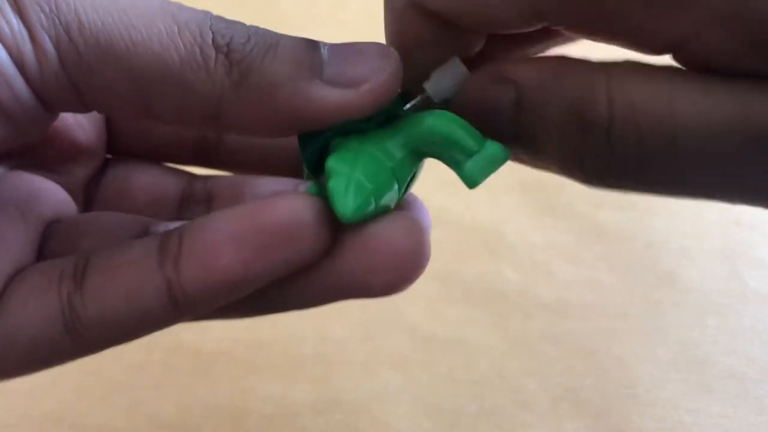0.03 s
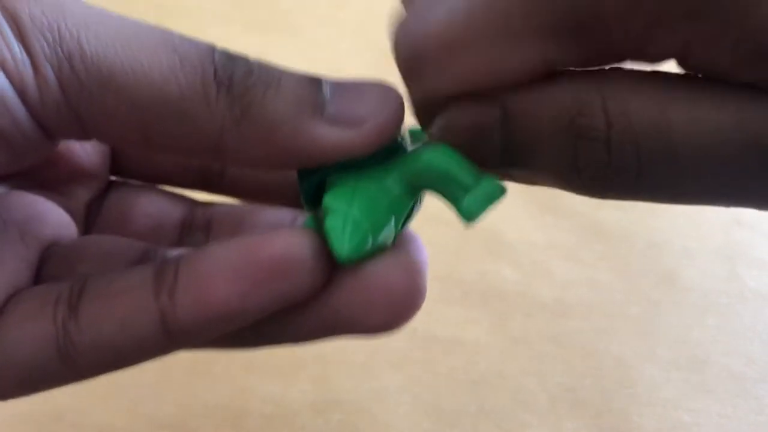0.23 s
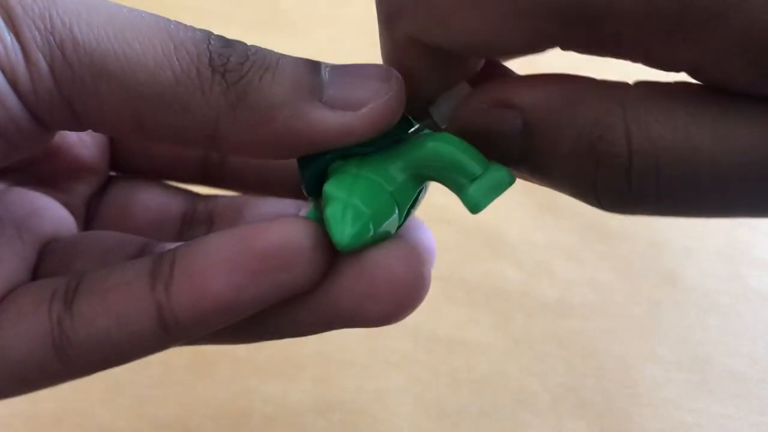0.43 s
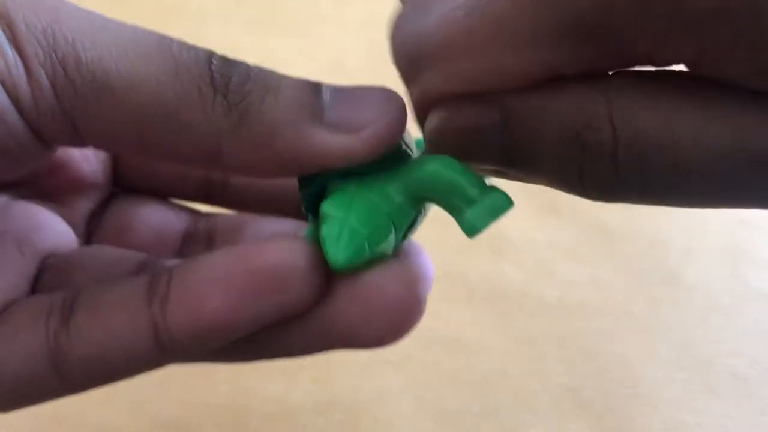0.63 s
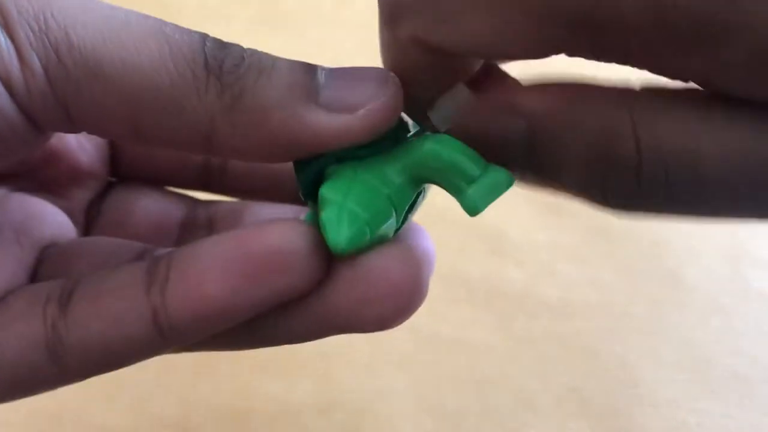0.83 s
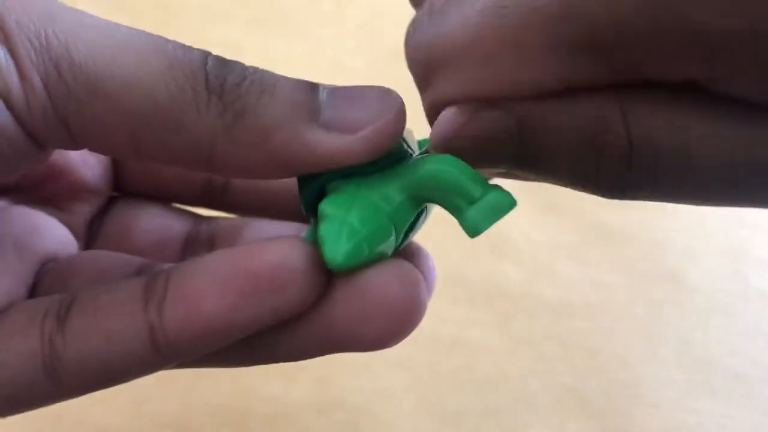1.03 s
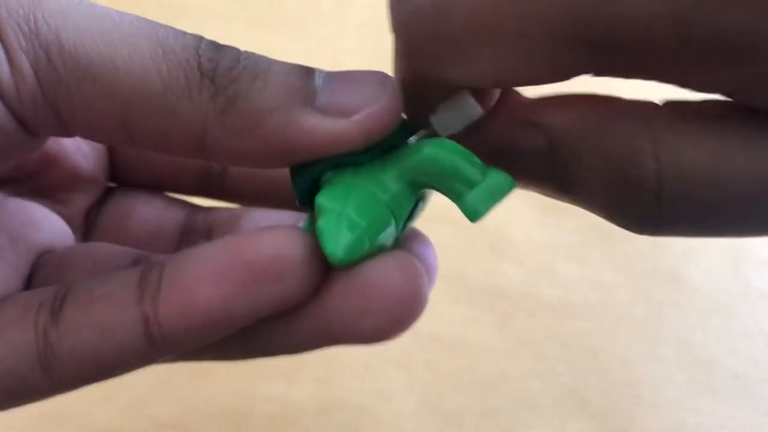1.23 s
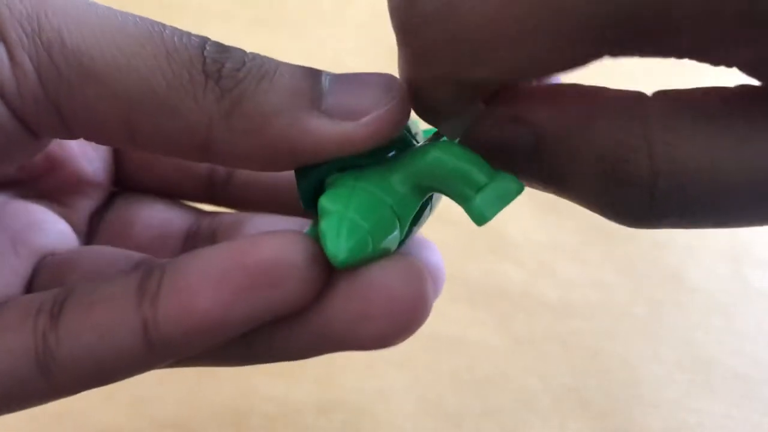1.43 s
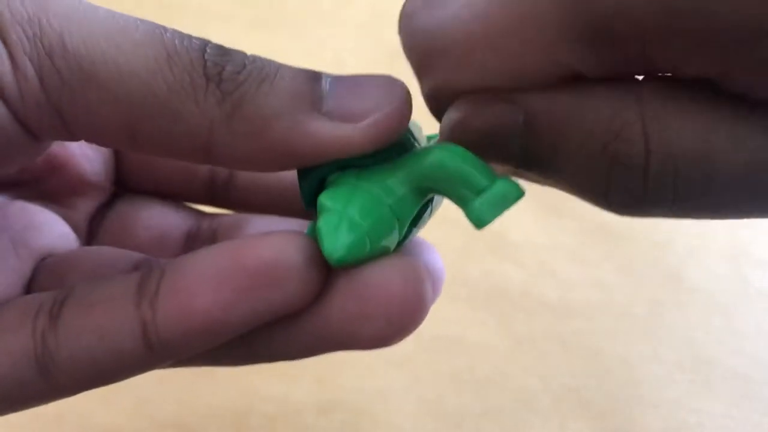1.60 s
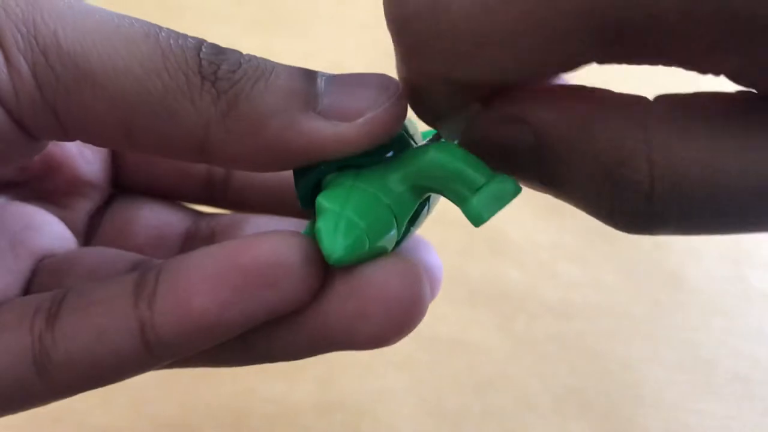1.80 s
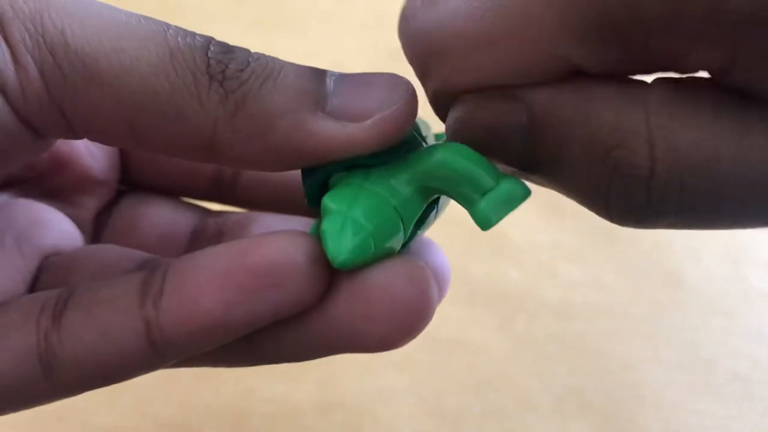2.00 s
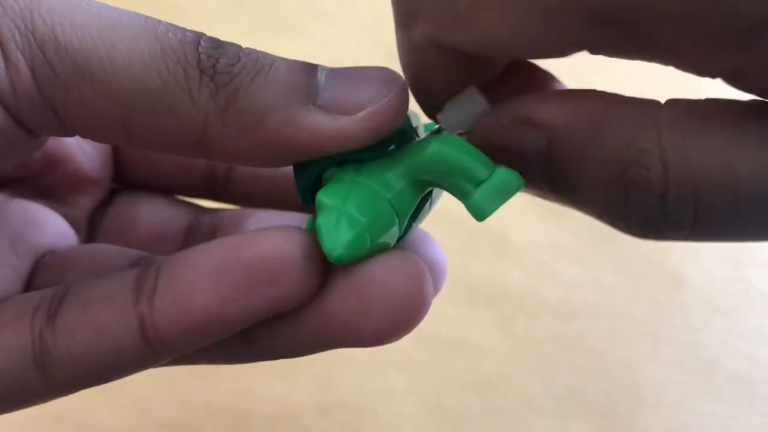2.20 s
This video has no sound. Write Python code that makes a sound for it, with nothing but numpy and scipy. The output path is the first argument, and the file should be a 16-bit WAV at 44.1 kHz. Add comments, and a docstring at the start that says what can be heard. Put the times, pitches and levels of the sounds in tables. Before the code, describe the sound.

Ratcheting clicks from a little wind-up toy come in five quick bursts as fingers turn its knob. After each, the gears rasp briefly and fingertips softly regrip the plastic. The sound is close, in a quiet room.

```python
"""A quiet room, close to the microphone: fingers twist the knob of a small plastic wind-up toy five times.
Each twist takes up the slack with light ticks, then the pawl snaps over its teeth and rings the shell.
A short, fast rasp of the gears follows, and the fingertips rub and tap as they take a new grip.
Under it lie a low rumble, faint hiss and weak hum; a short room tail follows the toy."""
import sys
import numpy as np
from scipy import signal
from scipy.fft import rfft, irfft
from scipy.io import wavfile

SR = 44100
rng = np.random.default_rng(int(sys.argv[2]) if len(sys.argv) > 2 else 0)


def file_out(sig):
    """Save sig as 16-bit WAV at sys.argv[1]."""
    # one column per channel
    cols = np.atleast_2d(sig).T
    # limit, then scale
    lim = np.clip(cols, -1, 1)
    pcm = np.round(lim * 32767).astype(np.int16)
    wavfile.write(sys.argv[1], SR, pcm)


N = 103635
HIT_S = .03  # time allowed for one hit to ring out


def undb(db):
    """Decibels to gain."""
    return 10 ** (np.asarray(db) / 20)


def seconds(length):
    """Time axis of a short sound."""
    return np.arange(int(length * SR)) / SR


def level(x, db, span=.002):
    """Give x the energy of a sound that stays at db for span seconds."""
    return x * undb(db) * np.sqrt(span * SR / (np.sum(x ** 2) + 1e-18))


def add(out, start, x):
    """Mix x into out at a time."""
    i = max(int(start * SR), 0)
    x = x[:max(len(out) - i, 0)]
    out[i:i + len(x)] += x


def colour(x, points):
    """Minimum-phase EQ through (Hz, dB) points: nothing rings ahead of an attack."""
    hz, db = np.array(points).T
    size = 4096
    f = np.maximum(np.arange(size // 2 + 1) * SR / size, 1)
    gain = undb(np.interp(np.log(f), np.log(np.sort(hz)), db))
    cepstrum = irfft(np.log(gain))
    cepstrum[1:size // 2] *= 2
    cepstrum[size // 2 + 1:] = 0
    return signal.fftconvolve(x, irfft(np.exp(rfft(cepstrum))))[:len(x)]


def ring(push, hz, t60):
    """One resonance set ringing by a push."""
    pole = np.exp((2j * np.pi * hz - np.log(1000) / t60) / SR)
    acceleration = signal.lfilter([1, -2, 1], [1], push)
    return signal.lfilter([1], [1, -pole], acceleration).imag


def struck(hz, t60):
    """A resonance dying away after one blow."""
    t = seconds(HIT_S)
    return np.sin(2 * np.pi * hz * t) * undb(-60 * t / t60)


def contact(rise_s, fall_s):
    """Brief chatter of two plastic faces: swells, then dies."""
    t = seconds(HIT_S)
    attack = np.minimum(t / rise_s, 1) ** 2
    decay = np.exp(-np.maximum(t - rise_s, 0) / fall_s)
    return rng.standard_normal(len(t)) * attack * decay


def friction(length, grains_per_s=710, scatter_db=.5, grain_s=.00035):
    """Two surfaces stick and slip in tiny grains."""
    n = int(length * SR)
    slips = (rng.random(n) < grains_per_s / SR) * undb(scatter_db * rng.standard_normal(n))
    grip = signal.lfilter([1], [1, -np.exp(-1 / (grain_s * SR))], slips) + .5
    return grip * rng.standard_normal(n) * signal.windows.tukey(n, .3)


# Bass-heavy room tone: (frequency [Hz], gain [dB])
AIR_EQ = [(25, -27), (45, 1), (65, 2), (200, -6), (350, -9), (500, -17), (2500, -23.5), (5300, -24.5),
          (8000, -28), (15500, -32)]
def room_tone(air_db=-63, hum_hz=140, hum_db=-80):
    """The bed: low rumble, faint hiss and a weak hum."""
    hum = np.sqrt(2) * undb(hum_db) * np.sin(2 * np.pi * hum_hz * np.arange(N) / SR)
    air = colour(rng.standard_normal(N), AIR_EQ)
    return level(air, air_db, N / SR) + hum


# Warm tone of the reflections: (frequency [Hz], gain [dB])
REVERB_EQ = [(1500, 11), (3300, 3), (5000, -6), (7000, 3), (11500, 2), (16500, -4)]
def reverb(x, early_t60=.05, early_db=-17.5, tail_t60=.32, tail_db=-21):
    """Quick reflections from hands and table, then the short tail of the room."""
    t = seconds(.6)
    fade_in = np.minimum(t / .0019, 1)
    response = 0
    for t60, db in ((early_t60, early_db), (tail_t60, tail_db)):
        echoes = rng.standard_normal(len(t)) * undb(-60 * t / t60) * fade_in
        response = response + level(colour(echoes, REVERB_EQ), db, 1 / SR)
    return signal.fftconvolve(x, response)[:N]


# Fingertips taking a new grip: (time [s], length [s], level [dB])
FINGER_RUBS = [(0, 0.023, -55.5), (0.385, 0.078, -57), (0.794, 0.038, -54.5), (1.118, 0.029, -54),
               (1.18, 0.054, -57), (1.268, 0.0817, -65), (1.683, 0.049, -53), (2.132, 0.0551, -51.5)]
# Tone of skin on plastic: (frequency [Hz], gain [dB])
RUB_EQ = [(500, -24), (2000, -23.5), (4200, -11), (5400, -4.5), (6400, -13), (11500, -17.5), (16000, -25.5)]
def finger_rubs():
    """Fingertips slide on the plastic, and their friction rings the shell."""
    out = np.zeros(N)
    for start, length, db in FINGER_RUBS:
        rub = level(colour(friction(length), RUB_EQ), 0)
        shell = level(ring(rub, hz=5570, t60=.0034), -6.5)
        add(out, start, level(rub + shell, db, length))
    return out


# A finger bumping the body: (time [s], knock level [dB], thump level [dB])
FINGER_KNOCKS = [(0.806, -48.5, -77), (1.204, -44.5, -51.5), (2.16, -56.5, -80)]
# Midrange tone of the bump: (frequency [Hz], gain [dB])
KNOCK_EQ = [(100, -9.5), (550, -16.5), (950, 16), (1500, 2), (8000, 1)]
# Resonances it wakes: (frequency [Hz], relative level [dB], time to fall 60 dB [s])
BODY_MODES = [(992, -19, 0.025), (1630, -13.5, 0.0087)]
def finger_knocks():
    """A soft push rings the body over a low thump."""
    out = np.zeros(N)
    for start, db, thump_db in FINGER_KNOCKS:
        push = level(colour(contact(rise_s=.0046, fall_s=.0011), KNOCK_EQ), 0)
        modes = sum(level(struck(hz, t60), mode_db) for hz, mode_db, t60 in BODY_MODES)
        thump = level(struck(hz=270.4, t60=.021), thump_db)
        add(out, start, level(push + modes, db) + thump)
    return out


# Handling taps: (time [s], level [dB])
SHELL_TAPS = [(.099, -57), (.13, -60.5), (0.3153, -42.5), (0.381, -51.5), (.392, -45), (0.7492, -36),
              (0.7554, -45), (0.807, -41), (.815, -42), (0.87, -51.5), (1.121, -44), (1.183, -48.5),
              (1.2019, -34), (1.233, -45.5), (1.342, -50.5), (1.641, -43), (2.145, -47), (2.1485, -39.5),
              (2.162, -44)]
# Thin, peaky tone of a tap: (frequency [Hz], gain [dB])
TAP_EQ = [(400, -24.5), (2000, -22.5), (3400, -10), (4300, -10.5), (5300, 6.5), (6500, -12.5), (9000, -11),
          (15000, -27)]
def shell_taps():
    """Knob and shell tap lightly under the fingers."""
    out = np.zeros(N)
    for start, db in SHELL_TAPS:
        tap = colour(contact(rise_s=.00069, fall_s=.0018), TAP_EQ)
        add(out, start, level(tap, db))
    return out


# Light ticks of the knob: (time [s], level before trim [dB])
SLACK_TICKS = [(0.1667, -39), (0.175, -36), (0.197, -35), (0.6008, -37), (0.605, -30), (0.6087, -30),
               (0.6118, -33), (0.618, -34), (0.6226, -33), (0.626, -27), (0.9602, -33), (0.963, -35),
               (0.9677, -33), (0.9855, -35), (0.99, -36), (0.9945, -29), (1.149, -40), (1.462, -42),
               (1.467, -35), (1.4706, -33), (1.475, -34), (1.48, -36), (1.8812, -35), (1.8858, -37),
               (1.902, -38), (1.906, -34), (1.9288, -33), (2.083, -40), (2.0888, -38), (2.298, -34),
               (2.303, -36), (2.308, -32), (2.321, -38), (2.3483, -33)]
# Bright tone of the ticks, also of shaft scrape and pawl rattle: (frequency [Hz], gain [dB])
TICK_EQ = [(500, -45.5), (2000, -24), (5400, -3.5), (6600, 0), (7700, -6.5), (10500, -5.5), (14000, -2),
           (16500, -24.5)]
def slack_ticks(trim_db=-.5):
    """Plastic faces touch as the knob takes up its slack."""
    out = np.zeros(N)
    for start, db in SLACK_TICKS:
        tick = colour(contact(rise_s=.00056, fall_s=.0012), TICK_EQ)
        add(out, start, level(tick, db + trim_db))
    return out


# Scrapes of the knob's shaft: (time [s], length [s], level [dB])
SHAFT_SCRAPES = [(1.87, .065, -47.5), (2.288, .048, -49)]
def shaft_scrapes():
    """The shaft sticks and slips as it starts to turn."""
    out = np.zeros(N)
    for start, length, db in SHAFT_SCRAPES:
        add(out, start, level(colour(friction(length), TICK_EQ), db, length))
    return out


# Rasp after each twist: (time [s], full-speed hold [s], level [dB], rate [teeth/s], whistle [Hz])
GEAR_RASPS = [(0.3469, 0.016, -30, 544, 13750), (0.7629, 0.01302, -27.5, 553, 10400),
              (1.1539, 0.016, -27.5, 422, 13500), (1.663, 0.012, -29, 560, 12160),
              (2.094, 0.01567, -28.5, 590, 11340)]
# Sharp, fizzy tone of the gears: (frequency [Hz], gain [dB])
GEAR_EQ = [(500, -45), (2000, -27.5), (3400, -17), (4250, -15.5), (4650, -0.5), (4900, -11.5), (5400, 6),
           (6200, -6), (8000, -8), (10150, -4.5), (10600, -9.5), (11300, -6), (15700, -6), (16500, -26.5)]
def gear_rasps(fade_s=.013, half_speed_s=.013, sag_db_per_s=82, scrape_db=-10.5, scatter_db=1.5):
    """Teeth skip by in a quick train that slows and fades, scraping and ringing a high resonance."""
    out = np.zeros(N)
    t = seconds(.09)
    attack = np.minimum(t / .00082, 1)
    for start, hold, db, rate, whistle_hz in GEAR_RASPS:
        coasting = np.maximum(t - hold, 0)
        speed = rate / (1 + coasting / half_speed_s)
        teeth, at = np.zeros(len(t)), 0
        for gap, size in rng.standard_normal((40, 2)):
            if at >= t[-1]:
                break
            add(teeth, at, contact(rise_s=.00055, fall_s=.00053) * undb(scatter_db * size))
            at += np.exp(.23 * gap) / speed[int(at * SR)]  # slightly uneven spacing
        scrape = undb(scrape_db) * rng.standard_normal(len(t))
        envelope = attack * np.exp(-coasting / fade_s) * undb(-sag_db_per_s * t)
        rasp = level(colour((teeth + scrape) * envelope, GEAR_EQ), 0)
        whistle = level(ring(rasp, whistle_hz, t60=.0045), -10.5)
        add(out, start, level(rasp + whistle, db, hold + fade_s / 2))
    return out


def tooth_burst(eq, peak_s=.0016, scatter_db=2.5):
    """The pawl slides off a tooth and lands: a quick burst, its length and tone new each time."""
    hz, db = np.array(eq).T
    age = 2 * seconds(HIT_S) / (peak_s * np.exp(.22 * rng.standard_normal()))
    burst = rng.standard_normal(len(age)) * (age * np.exp(-age)) ** 2
    varied_db = db + scatter_db * rng.standard_normal(len(hz))
    return colour(burst, np.column_stack([hz, varied_db]))


# The pawl clearing each tooth: (time [s], shell level [dB], crack level [dB], ring pitch [Hz])
PAWL_SNAPS = [(0.2079, -21.0, -20.5, 5380), (0.2186, -31.5, -15.5, 5430), (0.2246, -24.0, -14.5, 5520),
              (0.2293, -25.5, -16.5, 5320), (0.2351, -20.5, -25.5, 5290), (0.2428, -22.5, -24.5, 5340),
              (0.252, -20.0, -22.5, 5200), (0.2748, -24.5, -25.0, 4550), (0.2782, -23.5, -25.0, 4710),
              (0.6286, -21.0, -21.0, 5460), (0.6385, -21.0, -24.5, 5600), (0.6475, -27.5, -24.5, 4800),
              (0.6538, -20.0, -21.0, 5240), (0.6609, -23.0, -18.5, 4740), (0.6733, -26.0, -31.0, 4680),
              (0.6752, -19.0, -17.0, 5190), (0.9971, -20.5, -22.0, 5600), (1.0051, -24.0, -22.5, 4660),
              (1.0092, -28.0, -24.5, 4580), (1.0132, -24.5, -22.0, 5080), (1.0198, -24.0, -22.0, 5400),
              (1.0307, -23.5, -21.0, 5130), (1.0456, -20.0, -21.0, 4740), (1.0812, -23.5, -24.5, 5150),
              (1.4842, -27.5, -26.0, 5330), (1.5036, -24.5, -18.0, 5400), (1.5254, -21.0, -22.0, 5220),
              (1.54, -17.0, -24.0, 5290), (1.5546, -21.5, -21.5, 4810), (1.5669, -24.5, -21.5, 5140),
              (1.5826, -23.0, -21.0, 5030), (1.9107, -19.0, -23.5, 5050), (1.9318, -24.0, -22.5, 5020),
              (1.9464, -17.0, -23.5, 5200), (1.9603, -20.0, -18.5, 5470), (1.9729, -19.5, -21.0, 5440),
              (1.9953, -25.0, -30.5, 4560), (1.9984, -23.0, -24.0, 4700)]
# Body of the snap, from the plastic shell: (frequency [Hz], gain [dB])
SHELL_EQ = [(300, -48), (2000, -33), (3300, -11), (4100, -11), (4550, 2), (5600, 0), (6200, -5), (6800, -8),
            (7500, -18), (9000, -30)]
# Crisp top of the snap: (frequency [Hz], gain [dB])
CRACK_EQ = [(2500, -46), (5000, -32), (7400, -13), (9900, -7), (10500, -13), (11100, -6), (12800, -1),
            (15300, 1), (16500, -12)]
def pawl_snaps(lead_s=.0005, ring_rise_s=.0008, rattle_db=-19, rattle_fall_s=.006):
    """Each snap shakes the shell, pings at its own pitch, cracks brightly and leaves a faint rattle."""
    out = np.zeros(N)
    t = seconds(HIT_S)
    ping_attack = (1 - np.exp(-t / ring_rise_s)) ** 2
    for start, shell_db, crack_db, hz in PAWL_SNAPS:
        shell = level(tooth_burst(SHELL_EQ), 0)
        crack = level(tooth_burst(CRACK_EQ), crack_db)
        t60 = .0042 * (5350 / hz) ** 5  # lower rings last longer
        ping = level(struck(hz, t60) * ping_attack, 0)
        grains = friction(HIT_S) * np.exp(-t / rattle_fall_s)
        rattle = level(colour(grains, TICK_EQ), crack_db + rattle_db)
        add(out, start - lead_s, level(shell + ping, shell_db) + crack + rattle)
    return out


def scene():
    """The toy and the hands up front, the room behind them, in mono."""
    toy = pawl_snaps() + slack_ticks() + shell_taps() + finger_knocks()
    toy += gear_rasps() + finger_rubs() + shaft_scrapes()
    return (toy + reverb(toy) + room_tone())[None]


def record(dry):
    """A steep low-pass takes off the very top, above 16.4 kHz."""
    return signal.sosfilt(signal.ellip(10, .2, 80, 16400, fs=SR, output="sos"), dry)


dry = scene()
out = record(dry)
file_out(out)
```